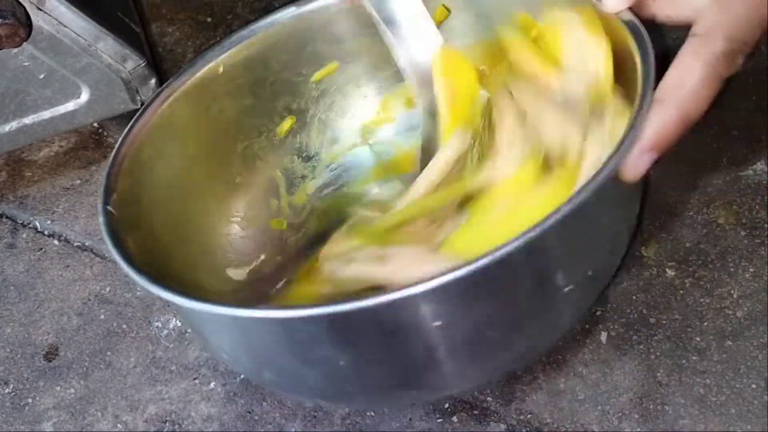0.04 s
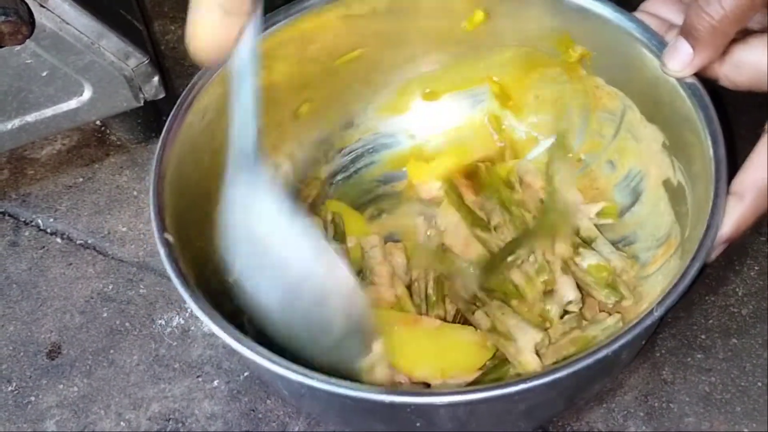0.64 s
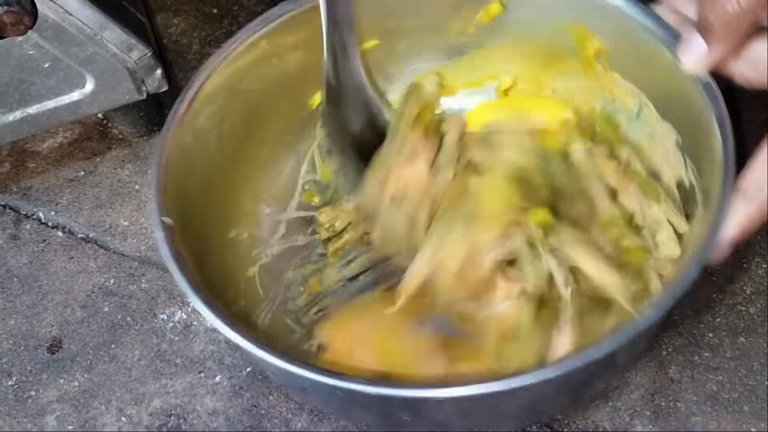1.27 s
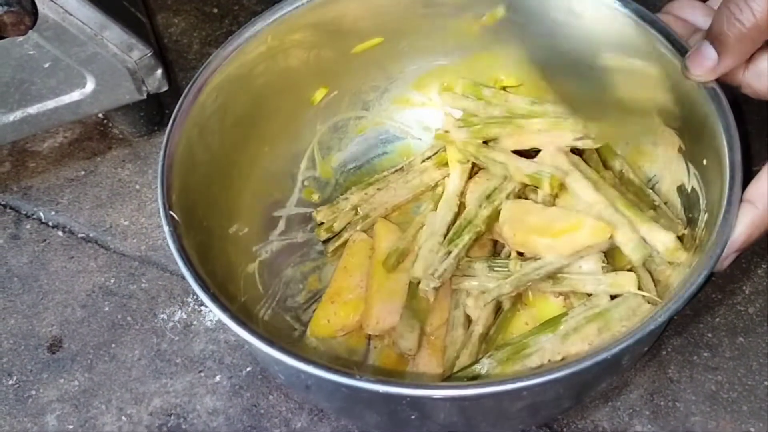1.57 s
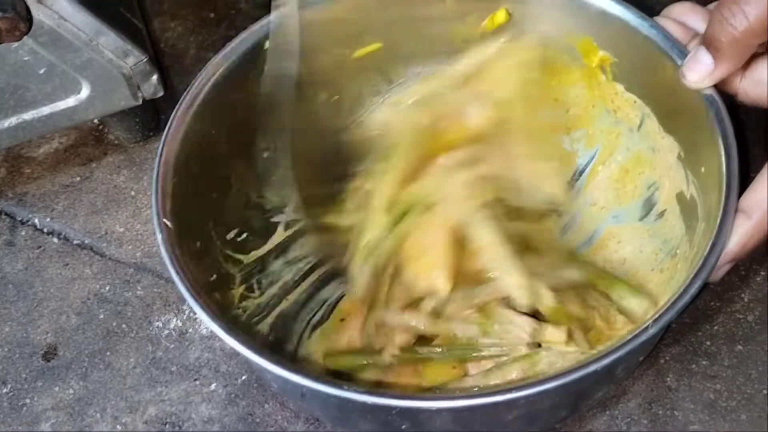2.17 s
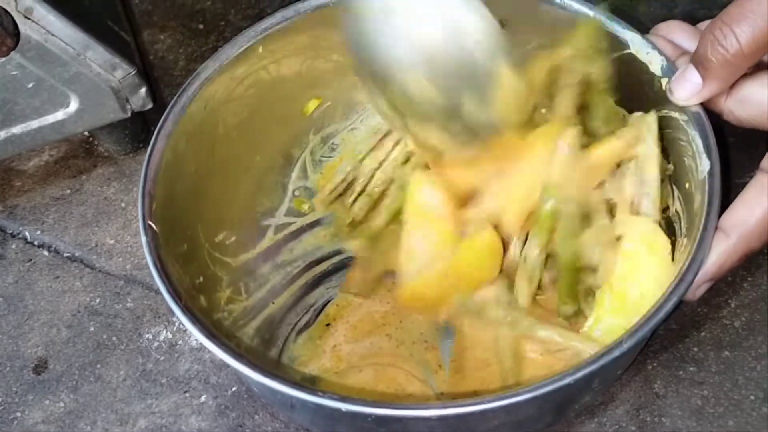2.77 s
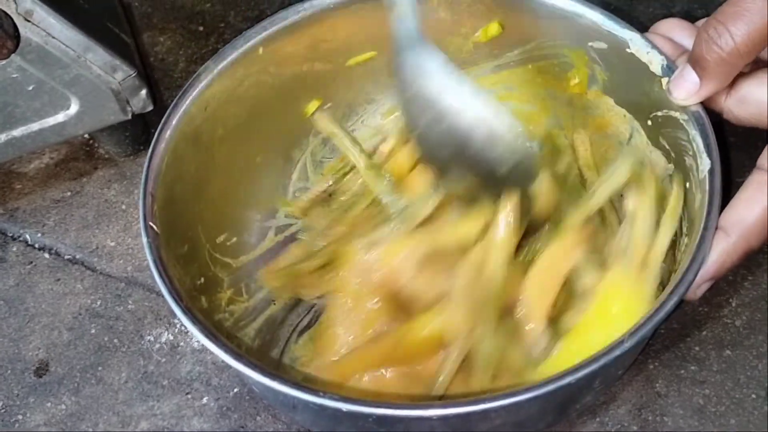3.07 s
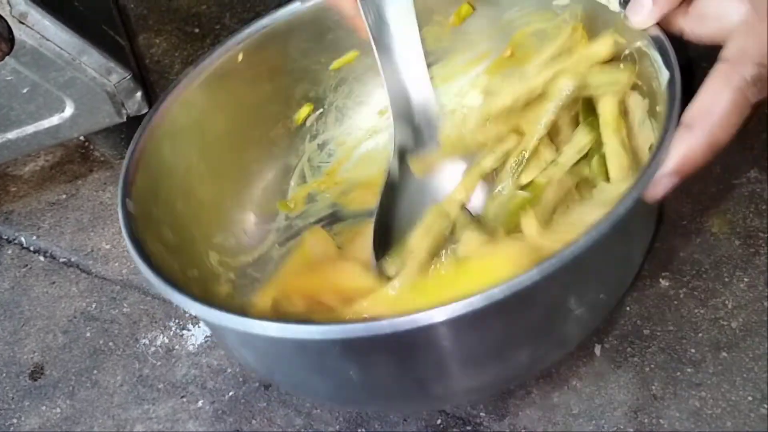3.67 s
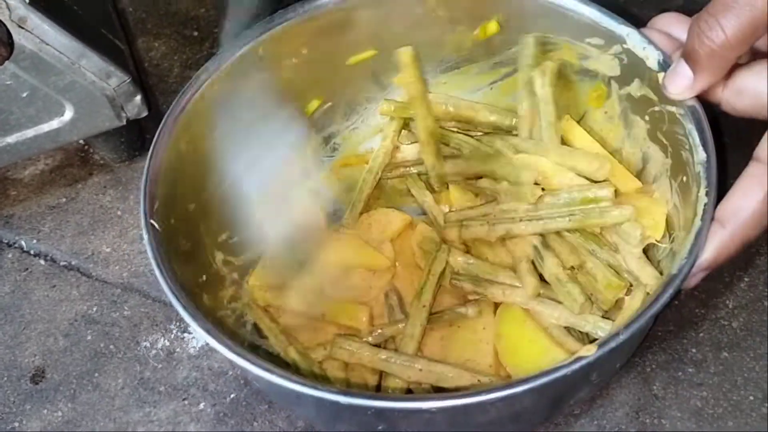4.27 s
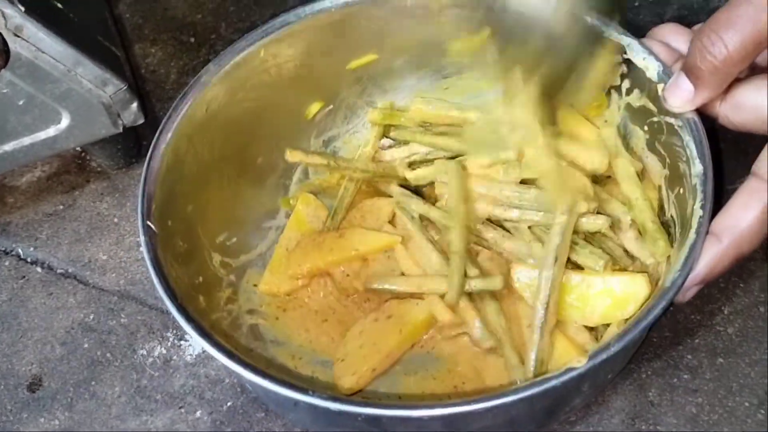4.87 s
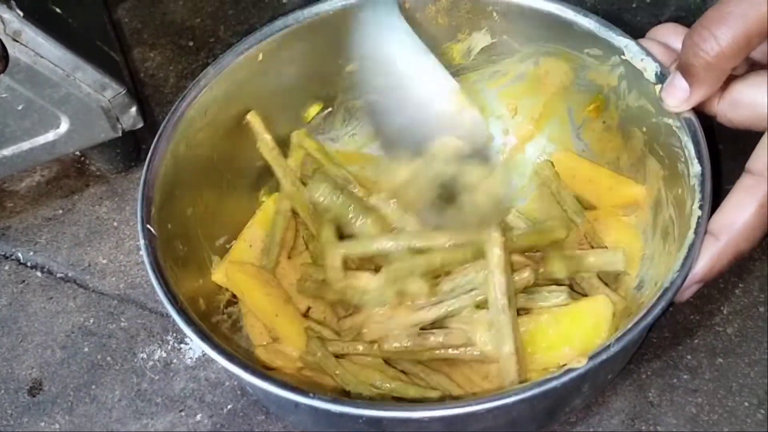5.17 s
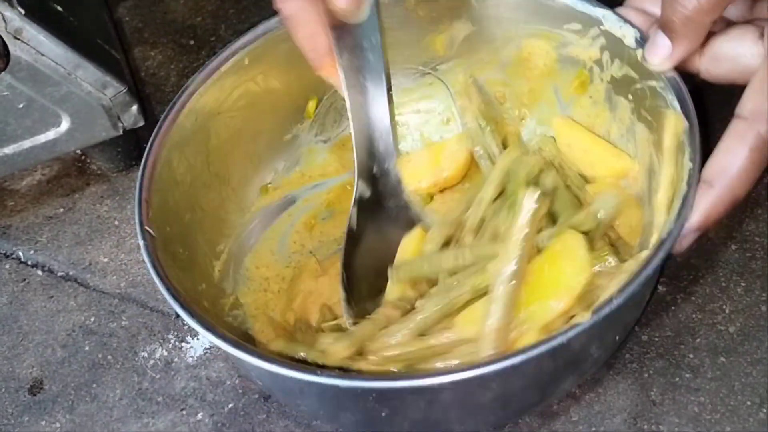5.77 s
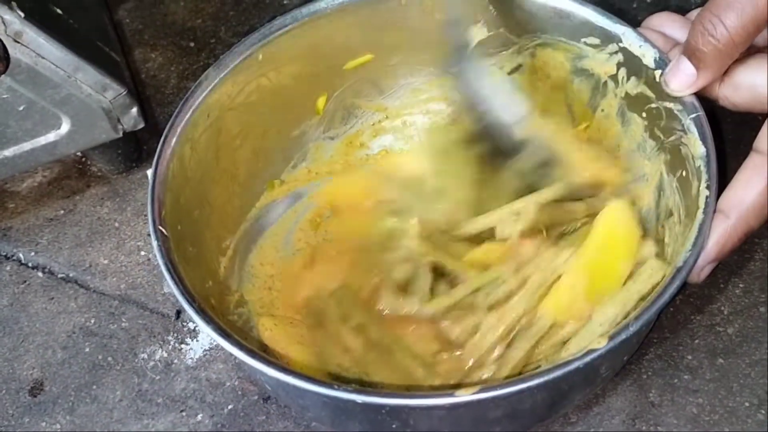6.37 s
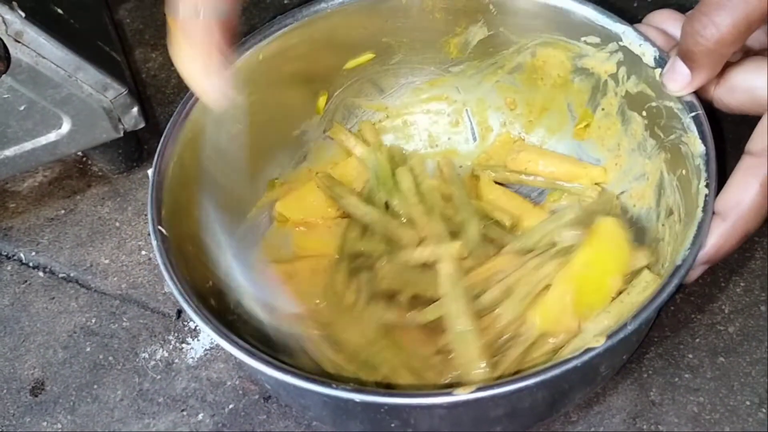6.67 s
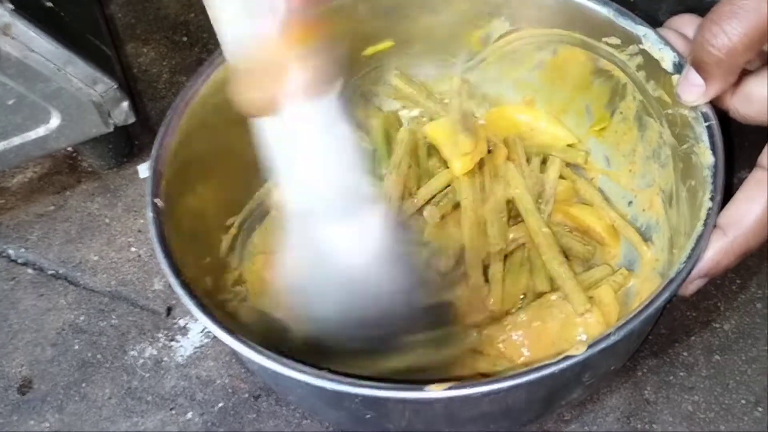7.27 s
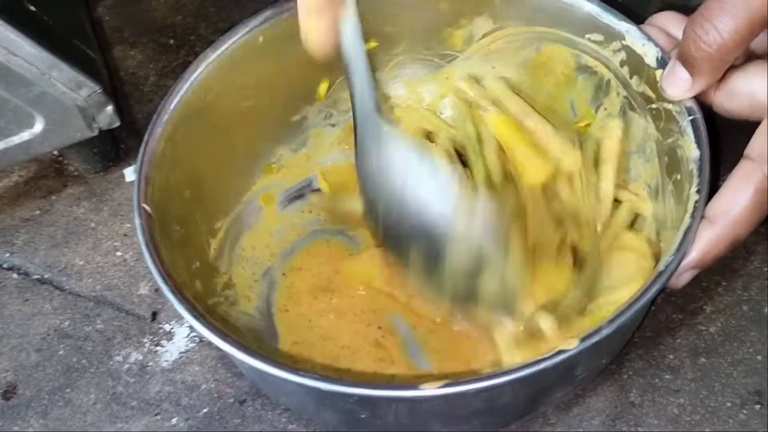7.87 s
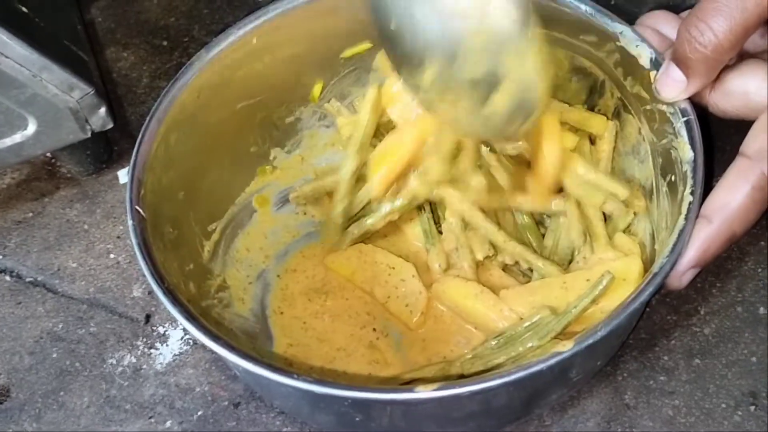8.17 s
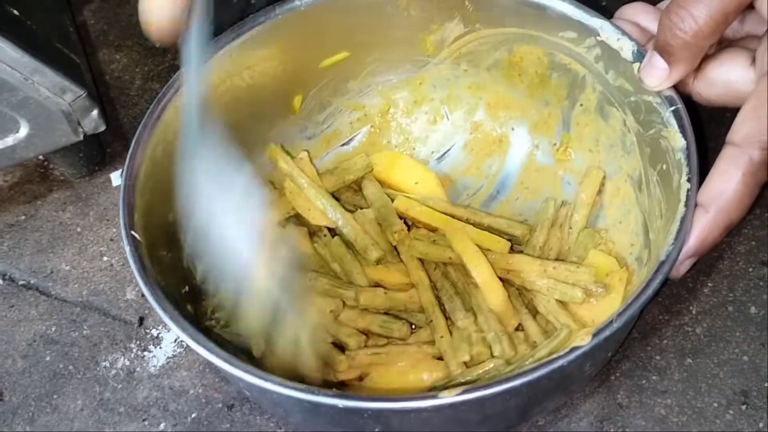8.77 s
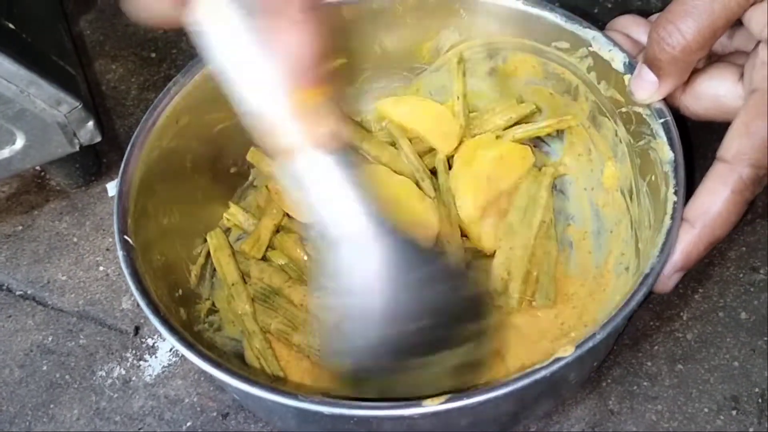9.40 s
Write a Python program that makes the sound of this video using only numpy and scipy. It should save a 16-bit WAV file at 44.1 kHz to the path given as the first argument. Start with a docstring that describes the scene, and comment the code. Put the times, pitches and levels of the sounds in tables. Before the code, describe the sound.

Close stirring of vegetables in wet paste: a metal spoon grates and taps on a steel bowl as the pieces softly smack.

```python
"""Stirring in a steel bowl

A small kitchen, one microphone close to a hand-held steel bowl of vegetables and wet spice paste.
About twice a second a steel spoon lands with a dull knock and grates along the wall, sticking and
slipping, while the sticky pieces tumble and smack. Bare steel clinks, and two hard blows clang.
Farther off are a low motor hum and a wash of distant noise."""
import sys
import numpy as np
from scipy import signal
from scipy.fft import rfft, irfft, next_fast_len
from scipy.io import wavfile
from scipy.ndimage import uniform_filter1d

SR = 44100
rng = np.random.default_rng(int(sys.argv[2]) if len(sys.argv) > 2 else 0)


def bounce(signal):
    """Save signal as a 16-bit WAV file at the path given by the first command-line argument."""
    frames = np.transpose(np.atleast_2d(signal))
    limited = np.clip(frames, -1, 1)
    pcm = np.round(limited * 32767).astype(np.int16)
    wavfile.write(sys.argv[1], SR, pcm)


N = 420713
TIME = np.arange(N) / SR
AGE = np.arange(int(.6 * SR)) / SR   # seconds since a touch
BEND_OCTAVES, BENDS_PER_S = .03, 9   # the travelling spoon loads the wall and bends its pitches


def from_db(db):
    """Decibels to gain."""
    return 10 ** (np.asarray(db) / 20)


def unit_power(x):
    """Scale to an rms of one."""
    return x / np.sqrt(np.mean(x ** 2) + 1e-20)


def add(out, start_s, sound):
    """Mix a sound in at a time."""
    start = max(0, round(start_s * SR))
    out[start:start + len(sound)] += sound[:N - start]


def drift(turns_per_s):
    """A smooth random wander with a spread of one."""
    knots = rng.standard_normal(8192)
    return unit_power(np.interp(TIME * turns_per_s, np.arange(len(knots)), knots))


def decay(t60_s):
    """Exponential fall of 60 dB in the given time."""
    return np.exp(-np.log(1000) * AGE / max(t60_s, 1e-3))


def onset(rise_s):
    """Exponential build-up to full strength."""
    return 1 - np.exp(-AGE / rise_s)


def colour(x, spectrum, focus_hz=1000, focus_db=0, octaves=1):
    """Shape a signal by (pitch_hz, level_db) rows, with one broad resonance on top; unit power."""
    size = next_fast_len(len(x))
    pitch = np.log2(np.maximum(np.arange(size // 2 + 1) * SR / size, 1))
    hz, db = np.transpose(spectrum)
    focus = focus_db * np.exp(-.5 * ((pitch - np.log2(focus_hz)) / octaves) ** 2)
    gain = from_db(np.interp(pitch, np.log2(hz), db) + focus)
    return unit_power(irfft(rfft(x, size) * gain, size)[:len(x)])


def contact(spectrum, hz, focus_db, octaves, uneven_db):
    """The crowded resonances of uneven strength that one touch wakes; they build within a millisecond."""
    grid_hz = np.arange(60, 16000, 110)
    known_hz, known_db = np.transpose(spectrum)
    level_db = np.interp(np.log(grid_hz), np.log(known_hz), known_db)
    level_db += uneven_db * np.clip(rng.standard_normal(len(grid_hz)), -2, 1)
    noise = rng.standard_normal(len(AGE))
    return onset(0.00043) * colour(noise, np.c_[grid_hz, level_db], hz, focus_db, octaves)


def grains(per_s, spread_db):
    """Random clicks of uneven size; unit power."""
    sizes = from_db(spread_db * np.minimum(rng.exponential(1, N), 4)) * rng.choice([-1, 1], N)
    return unit_power(sizes * (rng.random(N) < per_s / SR))


def narrow_tone(hz, width_hz):
    """A rough tone: a narrow band of noise whose pitch may glide; unit power."""
    phase = 2 * np.pi * np.cumsum(hz) / SR
    steps = np.arange(len(hz)) * 2 * abs(width_hz) / SR
    knots = np.arange(int(steps[-1]) + 2)
    sine, cosine = (np.interp(steps, knots, row) for row in rng.standard_normal((len(knots), 2)).T)
    return unit_power(sine * np.sin(phase) + cosine * np.cos(phase))


# Partials of a motor, well behind the bowl: pitch_hz, level_db
MOTOR_PARTIALS = [(147.8, -58.5), (246.2, -67.5), (295.9, -60.5)]


def motor_hum():
    """A motor hums on three low partials, each wavering a little in phase and level."""
    out = np.zeros(N)
    for hz, db in MOTOR_PARTIALS:
        partial = np.sqrt(2) * np.sin(2 * np.pi * hz * TIME + 0.1 * drift(3.8))
        out += from_db(db + drift(4.4)) * partial
    return out


# Spectra of the rumble, the far wash and the hiss: pitch_hz, relative_db
RUMBLE_SPECTRUM = [(20, -40), (45, -58), (60, -40.5), (78, 10.5), (92, 7), (115, 5.5), (185, 5.5),
                   (225, -6.5), (330, 0), (400, -25), (900, -16), (3000, -66)]
WASH_SPECTRUM = [(40, -8), (150, 7), (400, -4.5), (800, 1), (1300, 0), (1900, 0), (2600, -4), (3700, -8.5),
                 (5500, -16.5), (9000, -40), (15000, -27)]
HISS_SPECTRUM = [(1000, -16.5), (3000, -27), (4700, -1), (7500, 7), (8800, -2.5), (10300, -13),
                 (13000, -45), (15500, -23)]
# How the wash and the hiss swell and fade: time_s, level_db
WASH_SWELL = [(0, -56), (1.0, -54.5), (2.5, -56.5), (5.2, -57.5), (6.1, -56.5), (8.7, -49.5), (9.3, -52),
              (9.54, -51)]
HISS_SWELL = [(0, -67), (2.3, -65.5), (2.8, -85), (3.15, -62.5), (5.1, -69.5), (7.1, -66.5), (8.7, -78.5),
              (9.54, -61)]


def room_tone():
    """The bed of the place: steady low rumble, distant wavering noise, a faint hiss coming and going."""
    rumble = from_db(-61) * colour(rng.standard_normal(N), RUMBLE_SPECTRUM)
    wash_db = np.interp(TIME, *np.transpose(WASH_SWELL)) + 1.1 * drift(21)
    wash = from_db(wash_db) * colour(rng.standard_normal(N), WASH_SPECTRUM)
    hiss_db = np.interp(TIME, *np.transpose(HISS_SWELL))
    hiss = from_db(hiss_db) * colour(rng.standard_normal(N), HISS_SPECTRUM)
    return rumble + wash + hiss


def kitchen_reflections(direct, t60_s=0.31, delay_s=.008):
    """Hard walls nearby return the sound to the microphone, diffuse, a little late and duller."""
    tail = colour(rng.standard_normal(len(AGE)), [(200, 3.5), (4000, -3.0), (15000, -5.0)])
    tail = tail * decay(t60_s) * (AGE > delay_s)
    return signal.fftconvolve(direct, tail / np.linalg.norm(tail))[:N]


# The heap turns over, down in the bowl: middle_s, length_s, level_db
HEAP_TURNS = [(0.215, 0.08, -44), (0.974, 0.23, -49), (1.23, 0.082, -56), (1.507, 0.56, -52.5),
              (2.45, 0.076, -48), (2.97, 0.35, -64), (3.768, 0.071, -46), (4.243, 0.044, -49.5),
              (4.59, 0.1, -56), (5.968, 0.079, -50), (6.197, 0.14, -54.5), (7.844, 0.23, -53),
              (8.39, 0.18, -55), (9.043, 0.084, -46)]
# Spectrum of wet pieces rubbing together: pitch_hz, relative_db
RUSTLE_SPECTRUM = [(300, -12), (800, 2), (1700, 4), (2800, -2), (4500, 1.5), (7500, 0.5), (10300, -14),
                   (13000, -9.5), (15500, -10)]


def tumbling_vegetables():
    """Wet pieces roll over one another: a soft, clumpy rustle that swells and fades."""
    swell = np.zeros(N)
    for middle_s, length_s, db in HEAP_TURNS:
        arch = signal.windows.cosine(max(round(length_s * SR), 2))
        add(swell, middle_s - length_s / 2, from_db(db) * arch)
    clumps = grains(2500, spread_db=2.5) * from_db(4 * drift(60))
    return swell * colour(clumps, RUSTLE_SPECTRUM)


# Spectrum of any hard contact, snapping paste as well as steel: pitch_hz, relative_db
HARD_SPECTRUM = [(100, -9.5), (400, -9), (800, -1), (1800, -6), (4200, -1), (7300, 0.5), (10300, -13.5),
                 (12500, -9.5), (15500, -9.5)]
# Sticky pieces part, close to the microphone: start_s, level_db
PASTE_SMACKS = [(0.2206, -32), (1.0238, -31.5), (1.253, -23), (1.877, -27), (2.0243, -29), (2.4233, -28),
                (2.4578, -29.5), (2.627, -46), (2.6614, -40), (2.883, -30.5), (2.93, -42), (3.0216, -41),
                (3.0376, -45), (3.0793, -26.5), (3.7529, -26), (3.8995, -32), (4.052, -27), (4.1763, -34.5),
                (4.5431, -31), (4.579, -22.5), (5.009, -23.5), (5.0609, -34.5), (5.316, -28.5),
                (5.9582, -29), (6.122, -35.5), (6.4138, -37), (6.642, -27), (6.8591, -18.5),
                (7.1218, -29.5), (7.6136, -24), (7.6645, -23), (7.7857, -24), (7.891, -28.5),
                (7.9475, -29.5), (8.2466, -30.5), (8.399, -39)]


def paste_smacks(centre_hz=4450, spread_octaves=0.17, rise_octaves_per_s=70, faint_per_s=6):
    """Films of paste snap in two steps, the opening pocket chirping upwards; faint ones fall at random."""
    out = np.zeros(N)
    slot_s = .1
    slots = np.arange(0, N / SR, slot_s)
    faint = [(s + slot_s * late, -42 + 2.5 * (2 * size - 1))
             for s, (late, size, chance) in zip(slots, rng.random((len(slots), 3)))
             if chance < slot_s * faint_per_s]
    rise = np.cumsum(2 ** np.minimum(rise_octaves_per_s * AGE, 1)) / SR   # stops one octave up
    for start_s, db in [*PASTE_SMACKS, *faint]:
        hz = centre_hz * 2 ** (spread_octaves * rng.standard_normal())
        film = contact(HARD_SPECTRUM, hz, focus_db=17, octaves=0.48, uneven_db=6)
        snap = film * (decay(0.021) + from_db(-24) * decay(0.15))
        chirp = np.sin(2 * np.pi * hz * rise) * decay(.03) * onset(.001)
        second_s = start_s + rng.uniform(.003, .012)
        add(out, min(start_s, TIME[-1]), from_db(db - 5.5) * snap)
        add(out, min(second_s, TIME[-1]), from_db(db - 15) * (snap + chirp))
    return out


# Short pitched tones from spoon and bowl: squeals, groans, a low thud, a faint hum and the ring
# of a knock: start_s, end_s, first_hz, last_hz, level_db
PITCHED_TONES = [(0.753, 0.803, 1167, 850, -46.5), (0.8, 0.835, 5080, 4980, -34),
                 (1.302, 1.656, 1670, 1650, -58.5), (2.352, 2.356, 1360, 1190, -24),
                 (3.467, 3.551, 1900, 1430, -38), (3.562, 3.659, 902, 627, -41.5),
                 (3.664, 3.702, 2560, 2540, -40), (4.87, 4.912, 5990, 6170, -20),
                 (5.537, 5.577, 1705, 1776, -31.5), (5.693, 5.721, 273, 250, -42),
                 (6.7, 6.736, 5970, 5750, -43), (7.314, 7.376, 1810, 1757, -38),
                 (7.532, 7.575, 1710, 1635, -47.5), (8.418, 8.425, 4070, 3600, -18)]


def pitched_tones():
    """Spoon and bowl sound one narrow resonance at a time, which fades in, glides and fades out."""
    out = np.zeros(N)
    for start_s, end_s, first_hz, last_hz, db in PITCHED_TONES:
        n = max(round((end_s - start_s) * SR), 64)
        tone = narrow_tone(np.linspace(first_hz, last_hz, n), width_hz=25 + 0.0367 * first_hz)
        add(out, start_s, from_db(db) * tone * signal.windows.tukey(n, .4))
    return out


# Modes of the free steel bowl: pitch_hz, rim_strike_db, wall_strike_db, t60_s
BOWL_MODES = [(753, -3.5, -27, 0.2), (1106, -19, -10, .16), (1250, -8, -0.5, 0.27), (1600, -10, -11, 0.39),
              (1702, -7.5, 0.5, 0.28), (1790, -18, 3.5, 0.16), (1915, -32, -4, 1), (1970, 1, -5, 0.25),
              (2053, -18, 9.5, 0.15), (2190, -14, -2, 0.16), (2310, -1, -19, 0.28), (2554, 1.5, 0, 0.17),
              (2824, 0, -1, 0.24), (3015, -13.5, -9, 0.39), (3230, 3.5, -14, 0.24),
              (3266, -12.5, -1.5, 0.11), (3860, -7, -11.5, 0.33), (4000, -9.5, -7.5, 0.16),
              (4120, -4, -8.5, 0.28), (4502, -13.5, -19, 0.62), (4843, -12, -29, 0.48),
              (5640, 3, -26, 0.26), (6053, -3, -32.5, 0.19), (6400, -2.5, -30, 0.27), (6670, 1, -20, 0.17),
              (7000, -5, -17, 0.19), (7260, -6, -6, 0.28)]


def bowl_rings():
    """The free ring of each mode, one per row; the bowl is not quite round, so each is a beating pair."""
    rings = []
    for hz, _, _, t60_s in BOWL_MODES:
        twin_hz = hz + rng.choice([-1, 1]) * rng.uniform(9.3, 21.6)
        mode = np.sin(2 * np.pi * (hz * AGE + rng.random()))
        twin = .5 * np.sin(2 * np.pi * (twin_hz * AGE + rng.random()))
        rings.append((mode + twin) * decay(t60_s) * onset(0.00091))
    return np.array(rings)


# Bare steel meets steel: start_s, level_db, brightest_hz, ping_t60_s
STEEL_CLINKS = [(0.2908, -16, 4100, 0.017), (0.6622, -25.5, 5200, 0.026), (0.8586, -27, 5040, 0.03),
                (1.475, -20, 3650, 0.032), (1.489, -22, 5370, 0.026), (1.953, -30.5, 6100, 0.11),
                (2.246, -21.5, 5000, 0.022), (2.292, -19, 3300, 0.013), (3.46, -6.5, 4400, 0.0084),
                (3.5748, -16.5, 5470, 0.035), (4.35, -23, 4240, 0.094), (5.351, -14.5, 5800, 0.058),
                (5.556, -31, 5500, 0.025), (5.667, -20, 5550, 0.027), (6.2991, -21, 4800, 0.014),
                (6.3131, -13, 5340, 0.019), (6.6834, -13, 5700, 0.08), (6.77, -22.5, 5560, 0.3),
                (6.796, -12, 4200, 0.03), (6.9032, -23, 5270, 0.092), (7.3123, -22, 4000, 0.024),
                (7.589, -22.5, 5700, 0.017), (7.6838, -18.5, 4020, 0.016), (7.722, -17, 4370, 0.035),
                (9.0258, -16.5, 4230, 0.033)]


def steel_clinks(rings, food_t60_s=0.25):
    """A light touch gives a sharp tick, a short ping and a faint ring that the food soon damps."""
    out = np.zeros(N)
    mode_hz = np.array(BOWL_MODES)[:, 0]
    for start_s, db, hz, t60_s in STEEL_CLINKS:
        tick = contact(HARD_SPECTRUM, hz, focus_db=20, octaves=0.62, uneven_db=3.5) * decay(0.03)
        ping = contact(HARD_SPECTRUM, hz, focus_db=12.5, octaves=0.14, uneven_db=4.5)
        ping *= decay(t60_s) + from_db(-28.5) * decay(0.19)
        octaves_away = np.abs(np.log2(mode_hz / hz))
        strengths = from_db(-31 - 1.6 * octaves_away + 4 * rng.standard_normal(len(mode_hz)))
        ring = strengths @ rings * decay(food_t60_s)
        add(out, start_s, from_db(db - 7) * (tick + ping + ring))
    return out


# Hard blows on the bowl, at close range:
# start_s, crash_db, crash_hz, focus_db, crash_t60_s, ring_db, place (0 rim, 1 wall), skid_s
HARD_BLOWS = [(4.8646, -7.5, 5420, 6, 0.2, -22.5, 0.02, 0.033),
              (8.4174, -10.5, 3100, 10.5, 0.12, -19, 0.98, 0.0052)]


def bowl_clangs(rings):
    """A hard blow crashes, skids briefly over the steel and leaves the bowl ringing."""
    out = np.zeros(N)
    _, rim_db, wall_db, _ = np.transpose(BOWL_MODES)
    for start_s, crash_db, hz, focus_db, t60_s, ring_db, place, skid_s in HARD_BLOWS:
        skid = 1 + 0.47 / (1 + (AGE / skid_s) ** 8)
        steel = contact(HARD_SPECTRUM, hz, focus_db, octaves=0.55, uneven_db=2)
        crash = from_db(crash_db - 9) * steel * decay(t60_s) * skid
        ring = from_db(ring_db + rim_db + place * (wall_db - rim_db)) @ rings
        # Paste smothers the ring after a blow on the wall, but a faint part lingers.
        damping = from_db(np.maximum(-340 * place * AGE, -19))
        add(out, start_s, crash + ring * damping)
    return out


# The bowl's resonances with the spoon's back pressed on it: pitch_hz, width_hz, relative_db
PRESSED_MODES = [(933, 33, -3.5), (1252, 32, -8), (1782, 47, 1), (2750, 94, -1), (3480, 48, -10.5),
                 (4010, 70, 3.5), (5180, 54, -7), (6660, 220, -0.5)]


def hollow_ring(t60_s=0.18):
    """The bowl rings hollow under the resting spoon; each landing shifts the pitch a little."""
    hz, _, db = np.transpose(PRESSED_MODES)
    hz = hz * 2 ** (BEND_OCTAVES * rng.standard_normal())
    strengths = from_db(db + 2.9 * rng.standard_normal(len(hz)))
    strengths /= np.hypot(1, hz / 2200)   # a cushioned blow wakes the low ones most
    partials = np.sin(2 * np.pi * (np.outer(hz, AGE) + rng.random((len(hz), 1))))
    return strengths @ partials * decay(t60_s) * onset(0.0012)


def singing_bowl():
    """Rubbed by the flat of the spoon, the resonances sing at half their width and bend together."""
    bend = 2 ** (.5 * BEND_OCTAVES * drift(BENDS_PER_S))
    chord = sum(from_db(db) * narrow_tone(hz * bend, width / 2) for hz, width, db in PRESSED_MODES)
    return unit_power(chord)


# Spectrum of a contact cushioned by food: pitch_hz, relative_db
SOFT_SPECTRUM = [(80, -18), (220, 1.5), (380, -7.5), (600, 3.5), (900, -6), (1300, -1), (2000, -8),
                 (4000, -13.5), (8000, -16), (15000, -57)]
# The spoon lands: start_s, level_db, pitch_hz, thud_relative_db, ring_relative_db
SPOON_LANDINGS = [(0.222, -35.5, 1386, -25, -14), (0.286, -28, 740, -12, -18),
                  (0.58, -28.5, 1110, -26, -25), (1.153, -26, 654, -20, -26), (1.243, -30, 1860, -17, -14),
                  (1.954, -26.5, 765, -15.5, -27), (2.35, -25, 1200, -39, -26),
                  (3.289, -18, 735, -21.5, -16), (3.9, -29, 745, -15, -24), (4.052, -33.5, 1110, -20, -13),
                  (4.925, -17, 1310, -42, -13), (5.321, -22, 1156, -21, -15),
                  (5.417, -27.5, 1404, -26, -10), (5.697, -23.5, 1307, -20, -23),
                  (5.776, -34.5, 790, -32, -21), (5.882, -31.5, 896, -14, -11), (5.898, -31, 713, -16, -16),
                  (6.315, -28.5, 948, -38, -22), (6.645, -17.5, 790, -30, -12),
                  (6.681, -26.5, 1210, -40, -21), (7.318, -24.5, 983, -22, -3.5)]


def spoon_knocks(thud_hz=262):
    """The spoon clunks through the food; the loaded bottom thuds, the wall answers, the bowl rings."""
    out = np.zeros(N)
    for start_s, db, hz, thud_db, ring_db in SPOON_LANDINGS:
        clunk = contact(SOFT_SPECTRUM, hz, focus_db=10, octaves=0.47, uneven_db=2)
        clunk *= decay(0.017) + from_db(-3) * decay(0.11)
        low_cut = signal.butter(2, 0.39 * hz, "high", fs=SR, output="sos")
        clunk = from_db(-8) * signal.sosfilt(low_cut, clunk)
        answer = from_db(-11) * np.sin(2 * np.pi * hz * AGE) * decay(0.12)
        bottom = contact(SOFT_SPECTRUM, thud_hz, focus_db=22, octaves=0.6, uneven_db=1.5)
        thud = from_db(thud_db) * bottom * decay(0.11)
        ring = .5 * from_db(ring_db) * hollow_ring()
        add(out, start_s, from_db(db) * (clunk + answer + thud + ring))
    return out


# The spoon drags along the wall: start_s, length_s, pressure_from_db, pressure_to_db,
# bite_from_db, bite_to_db, grit_db (relative to the bite), flatness (0 on edge, 1 lying flat)
SPOON_STROKES = [(0, 0.037, -35, -60, -38.5, -51, -14, 0), (0.189, 0.16, -42, -49, -65, -68, -16, 0),
                 (0.432, 0.17, -56, -56, -51, -51, -20, 0.13), (0.606, 0.041, -50, -47, -42, -48, -5, 0),
                 (0.677, 0.053, -58, -41, -36.5, -33, -9.5, 0.04),
                 (.735, 0.062, -41, -41.5, -39, -36, -7, 0.43),
                 (0.802, .05, -49, -40, -33.5, -35, -13, 0.07),
                 (0.855, .06, -37, -41, -29.5, -36, -20, 0.05),
                 (1.472, 0.031, -51, -42, -26, -51.5, -20, 0.08),
                 (2.037, 0.098, -74, -43, -40.5, -35, -3, 0.13),
                 (2.156, 0.068, -45.5, -42, -37.5, -33.5, -5.5, 0.23),
                 (2.227, 0.058, -51, -31, -36, -36, -21, 0.18),
                 (2.363, 0.034, -49, -49, -37, -56, -17, 0.1),
                 (3.288, 0.059, -41, -34, -45, -39.5, -7, 0.4),
                 (3.365, 0.12, -48, -32.5, -39.5, -28.5, -2, 0.23),
                 (3.486, .19, -37.5, -34, -38, -34.5, -15, 0.04),
                 (4.38, 0.062, -52, -46.5, -35.5, -37, -7.5, 0.15),
                 (4.49, 0.026, -55, -56, -33.5, -54, -5, 0.1),
                 (5.401, 0.036, -54, -31, -40, -43, -15, 0.35),
                 (5.481, 0.053, -48, -36.5, -39, -34, -9, 0.02),
                 (5.529, 0.067, -46, -38, -34.5, -36, -5, 0), (5.598, 0.052, -40, -40, -33, -36, -20, 0.06),
                 (5.648, 0.052, -48, -31, -26, -37.5, -24, 0.09),
                 (6.32, 0.023, -35, -40, -29, -44.5, -6.5, 0.2), (6.764, .11, -38, -46, -47, -38, 0, 0.15),
                 (6.885, 0.05, -35, -48, -48, -44.5, -16, 0.4),
                 (7.317, 0.11, -29.5, -59, -38, -37.5, -3, 0.79), (7.447, .11, -52, -42, -31, -40, -7, 0.2),
                 (7.615, 0.15, -39.5, -52, -47, -40, -27, 0.2),
                 (8.448, 0.068, -32, -36.5, -41, -38, -0.5, 0.1),
                 (8.831, 0.022, -49, -52, -47, -47, -15, 0.07), (8.879, 0.048, -50, -46, -42, -40.5, -5, 0),
                 (9.348, 0.071, -36.5, -49, -48, -39.5, -10, 0.7),
                 (9.429, 0.016, -52, -33, -35, -32, -6, 0.8), (9.471, 0.051, -52, -45, -51, -39, 1.5, 0.06)]


def stroke_controls(attack_s=0.0052, release_t60_s=0.085, settle_t60_s=0.4, wipe_db=-4):
    """Strokes take hold, lean in or ease off, then let go; gives pressure, bite, grit and flatness."""
    pressure_power, bite_power, grit_power, flat_power = np.zeros((4, N))
    age = np.arange(SR) / SR
    for start_s, length_s, press_from, press_to, bite_from, bite_to, grit_db, flatness in SPOON_STROKES:
        progress = np.minimum(age / length_s, 1)
        since_end = np.maximum(age - length_s, 0)
        release = from_db(-60 * since_end / release_t60_s)
        settle = from_db(-13 - 60 * since_end / settle_t60_s)   # the pieces slide on after the spoon
        hold = np.minimum(age / attack_s, 1) * np.maximum(release, settle)
        pressure = hold * from_db(press_from + (press_to - press_from) * progress)
        bite = hold * from_db(bite_from + (bite_to - bite_from) * progress)
        grit = bite * from_db(grit_db + wipe_db * progress)   # the stroke wipes some paste away
        add(pressure_power, start_s, pressure ** 2)
        add(bite_power, start_s, bite ** 2)
        add(grit_power, start_s, grit ** 2)
        add(flat_power, start_s, bite ** 2 * flatness)
    flat_share = flat_power / (bite_power + 1e-20)
    return np.sqrt(pressure_power), np.sqrt(bite_power), np.sqrt(grit_power), flat_share


def stick_slip(pressure, bite, slips_per_s=115, depth_db=10):
    """The edge slips at an uneven pace; each slip starts sharply and dies, deeper under more pressure."""
    slips = np.cumsum(slips_per_s * 2 ** (.5 * drift(90))) / SR
    size = rng.uniform(.5, 2, 8192)[slips.astype(int)]
    pressure_share = pressure / (np.hypot(pressure, bite) + 1e-20)
    gain = from_db(depth_db * np.sqrt(pressure_share) * size * (.5 - slips % 1))
    return gain / np.sqrt(uniform_filter1d(gain ** 2, size=2048))


def rubbed_modes(spectrum, low_hz, high_hz, width_hz, turns_per_s, wander_db, count):
    """Damped resonances swell and fade in turn as the contact point travels; unit power."""
    known_hz, known_db = np.transpose(spectrum)
    out = np.zeros(N)
    for hz in np.geomspace(low_hz, high_hz, count) * rng.uniform(0.93, 1.02, count):
        db = np.interp(hz, known_hz, known_db) + 10 * np.log10(hz)   # higher ones lie further apart
        bend = 2 ** (BEND_OCTAVES * drift(BENDS_PER_S))
        out += narrow_tone(hz * bend, width_hz) * from_db(db + wander_db * np.tanh(drift(turns_per_s)))
    return unit_power(out)


def gritty_paste(t60_s=0.033):
    """Each speck under the edge briefly wakes the highest resonances of the steel; unit power."""
    specks = grains(1500, spread_db=3.5) * from_db(4 * drift(70))
    ring = contact(HARD_SPECTRUM, hz=12860, focus_db=21.5, octaves=0.6, uneven_db=3) * decay(t60_s)
    return unit_power(signal.fftconvolve(specks, ring)[:N])


# Spectra of the edge dragged over steel and of the wall groaning under it: pitch_hz, relative_db
EDGE_SPECTRUM = [(900, -43), (2200, -7), (3000, -7), (4200, -0.5), (5500, -4.5), (7300, -10), (8500, -7),
                 (10300, -20.5), (12500, -35), (15500, -16)]
WALL_SPECTRUM = [(150, -33), (400, -37), (600, -4.5), (760, 9.5), (1060, -9.5), (1250, 8.5), (1480, 2),
                 (1750, 9.5), (2300, -1.5), (3200, 2), (6000, -25)]


def spoon_scraping():
    """Up close, the edge grates over gritty paste and the wall groans; laid flat, it makes the bowl sing."""
    pressure, bite, grit, flatness = stroke_controls()
    flicker = from_db(1.2 * drift(35) + 1.2 * drift(130) + drift(600))
    edge = from_db(-6) * bite * colour(grains(4000, spread_db=0.5), EDGE_SPECTRUM)
    wall = from_db(-6) * pressure * colour(grains(5000, spread_db=3), WALL_SPECTRUM)
    chatter = stick_slip(pressure, bite)
    low = rubbed_modes(WALL_SPECTRUM, 780, 2300, width_hz=36, turns_per_s=18, wander_db=6.5, count=9)
    high = rubbed_modes(EDGE_SPECTRUM, 2650, 8000, width_hz=110, turns_per_s=55, wander_db=8, count=19)
    resonances = from_db(-4) * pressure * low + bite * high
    grating = from_db(-1.5) * flicker * chatter * (edge + wall + resonances)
    song = from_db(-5) * np.hypot(pressure, bite) * singing_bowl()
    specks = grit * gritty_paste()
    clicks = colour(grains(130, spread_db=0), HARD_SPECTRUM, focus_hz=6900, focus_db=11.5)
    crackle = (from_db(-13) * bite + from_db(-76)) * clicks
    return np.sqrt(1 - flatness) * grating + np.sqrt(flatness) * song + specks + crackle


def scene():
    """Mono: spoon and bowl close to the microphone, the kitchen's reflections and background behind."""
    rings = bowl_rings()
    strikes = bowl_clangs(rings) + steel_clinks(rings) + spoon_knocks()
    stirring = strikes + spoon_scraping() + pitched_tones() + tumbling_vegetables() + paste_smacks()
    reflections = from_db(-12) * kitchen_reflections(stirring)
    return (stirring + reflections + motor_hum() + room_tone())[None]


def record(dry, low_cut_hz=50, high_cut_hz=15550):
    """The microphone sheds the deep bass, the highest peaks are clipped and the top is cut."""
    high_pass = signal.butter(2, low_cut_hz, "high", fs=SR, output="sos")
    low_pass = signal.ellip(12, .1, 80, high_cut_hz, fs=SR, output="sos")
    clipped = np.clip(signal.sosfilt(high_pass, dry), -1, 1)
    return signal.sosfilt(low_pass, clipped)


dry = scene()
out = record(dry)
bounce(out)
```